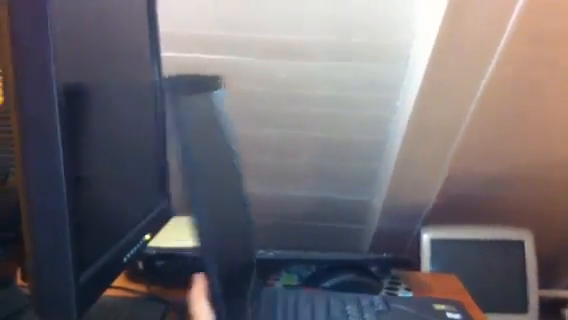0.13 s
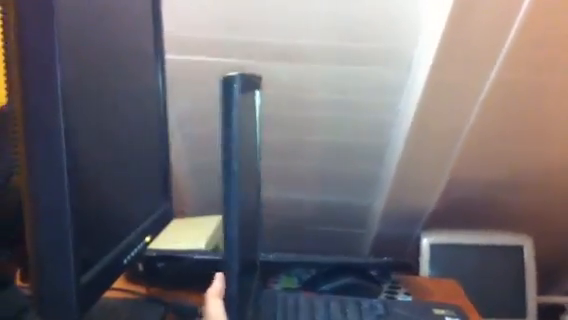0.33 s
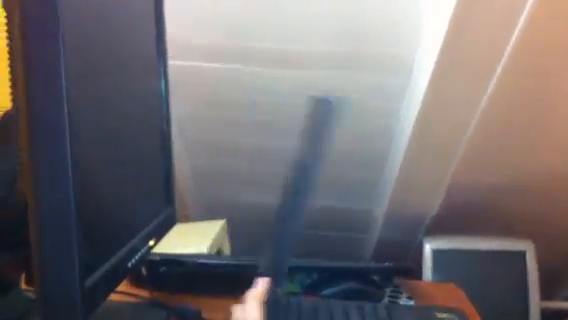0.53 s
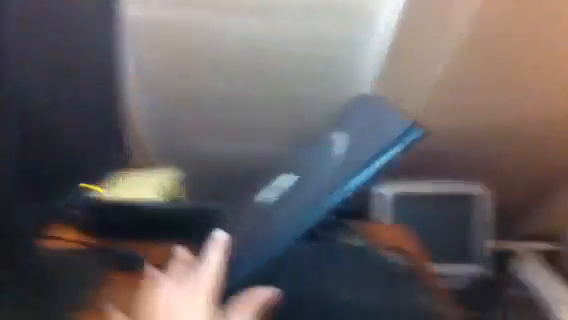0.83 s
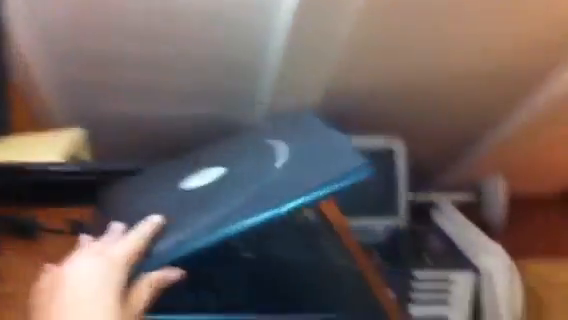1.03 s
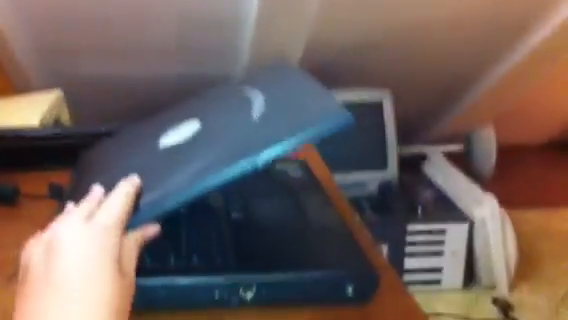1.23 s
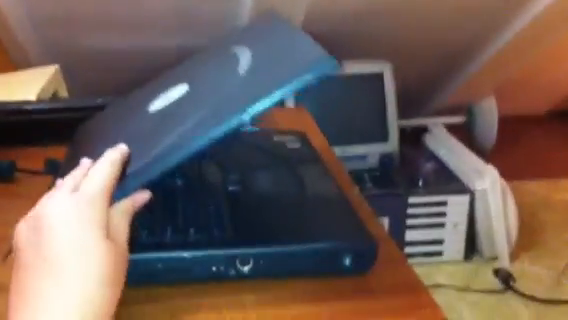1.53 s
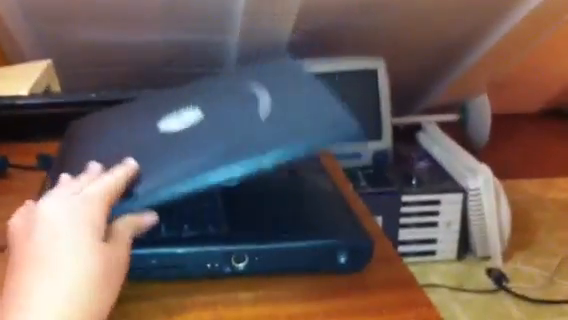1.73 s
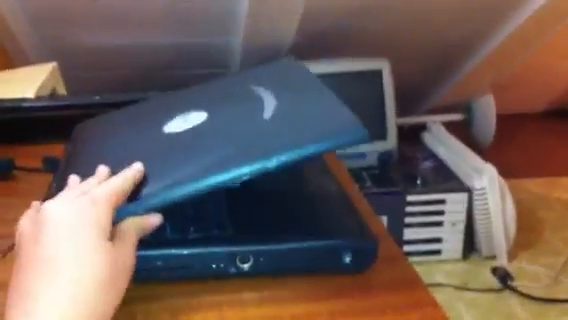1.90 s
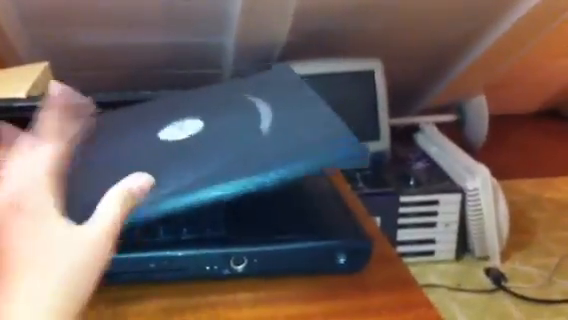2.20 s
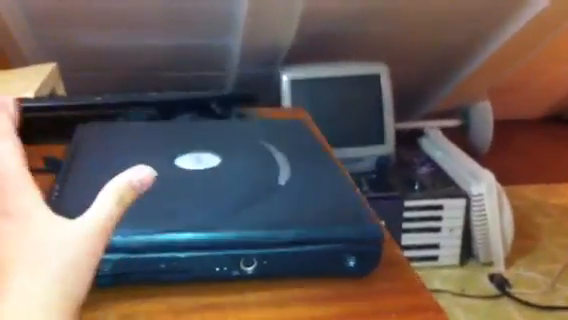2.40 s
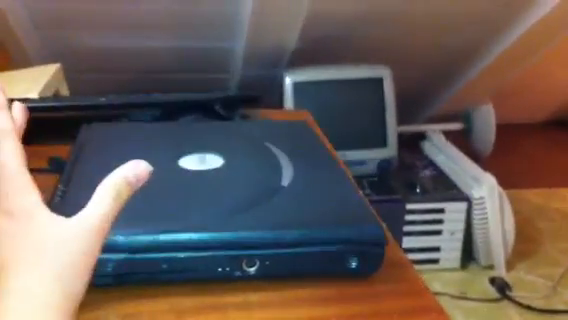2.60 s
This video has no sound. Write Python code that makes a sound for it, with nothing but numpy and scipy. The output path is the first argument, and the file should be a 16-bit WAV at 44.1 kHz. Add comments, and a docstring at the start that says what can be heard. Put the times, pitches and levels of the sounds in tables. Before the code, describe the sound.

A laptop lid shuts with a loud, hard plastic clack at about 2.45 s, several contacts almost at once, with short case and desk ringing and a small-room tail. Before it, very quiet: dull bumps from 0.1 s, clustered near 0.7 s, a hand brushing plastic with thuds and ticks around 0.9-1.25 s, sparse knocks, then a brief release scuff at 2.28 s. Low patter and faint microphone hiss throughout.

```python
"""A loose laptop lid clacks shut on its base in a small quiet room: noise cracks at each contact, ringing modes
of case and desk, and the room's decaying answer; just before it a short hiss swells and the level dips. Before
it a hand brushes the plastic (two-band hiss) and the case ticks (noise bursts), bumps (damped tones) and thuds
(low noise). Dull grains make a low patter, under microphone hiss."""
import sys
import numpy as np
from scipy import signal
from scipy.fft import rfft, irfft, next_fast_len
from scipy.io import wavfile
from scipy.ndimage import map_coordinates

SR = 44100
rng = np.random.default_rng(int(sys.argv[2]) if len(sys.argv) > 2 else 0)


def attenuation_scalar(level_db):
    """Turn a level in dB into a linear amplitude multiplier (20 dB per decade)."""
    decades = np.asarray(level_db, float) / 20
    return 10 ** decades


def generate_wav(signal):
    """Clip the signal to [-1, 1] and save it as 16-bit WAV at the path in sys.argv[1]."""
    frames = np.transpose(np.atleast_2d(signal))
    scaled = np.clip(frames, -1, 1) * 32767
    pcm = np.round(scaled).astype(np.int16)
    wavfile.write(sys.argv[1], SR, pcm)


N = 121275


def unit(x):
    """Scaled to rms 1."""
    return x / np.sqrt(np.mean(x ** 2) + 1e-20)


def along(points, hz):
    """(frequency [Hz], value) points read on a log frequency axis."""
    f, v = np.transpose(points)
    return np.interp(np.log(hz + 1), np.log(f + 1), v)


def level(rows):
    """Gain per sample from (time [s], level [dB]) rows."""
    s, db = np.transpose(rows)
    return attenuation_scalar(np.interp(np.arange(N) / SR, s, db))


def wobble(knots_per_s):
    """A smooth random curve, at most 100 knots a second."""
    knots = rng.standard_normal(400)
    return map_coordinates(knots, [np.arange(N) * min(knots_per_s, 100) / SR])


def filtered(x, response):
    """x shaped by a response of frequency in Hz."""
    m = next_fast_len(len(x) + SR // 2)
    spectrum = rfft(x, m) * response(np.fft.rfftfreq(m, 1 / SR))
    return irfft(spectrum, m)[:len(x)]


def noise(colour, count=N):
    """Coloured noise of rms 1."""
    return unit(filtered(rng.standard_normal(count), lambda hz: attenuation_scalar(along(colour, hz))))


def add(track, s, sound):
    """Adds a sound at s seconds, in place."""
    part = track[round(s * SR):][:len(sound)]
    part += sound[:len(part)]


def damped(hz, cycles, t):
    """A soft-starting sine that loses 20 dB every `cycles` cycles."""
    decay = attenuation_scalar(-20 * t * hz / cycles)
    attack = 1 - np.exp(-t * hz * 4)
    return np.sin(2 * np.pi * hz * t) * decay * attack


def room(x, colour):
    """The room's answer: a noise tail in which each frequency dies at its own speed."""
    # decay of the room: (frequency [Hz], t60 [s])
    room_t60 = [(100, 0.58), (400, 0.33), (2000, .43), (6000, 0.4), (11000, 0.32), (15000, 0.27)]
    delay_s = 0.003
    hz, t, z = signal.stft(rng.standard_normal(SR // 2), SR, nperseg=512)
    tail_db = along(colour, hz)[:, None] - 60 * t / along(room_t60, hz)[:, None]
    tail = signal.istft(z * attenuation_scalar(tail_db), SR, nperseg=512)[1]
    tail = np.pad(tail / np.linalg.norm(tail), (round(delay_s * SR), 0))
    return signal.fftconvolve(x, tail)[:N]


def mic_hiss():
    """Steady coloured noise of the microphone."""
    # spectrum of the hiss: (frequency [Hz], level [dB])
    hiss_colour = [(900, -35), (1500, -5.5), (2000, -6), (4000, -9), (8000, -12), (13000, -14.5),
                   (16000, -11.5)]
    return attenuation_scalar(-68.5) * noise(hiss_colour)


def patter():
    """Many small dull damped grains over a low coloured rumble, wavering in level."""
    # level of the patter: (time [s], level [dB])
    patter_level = [(0, -55.5), (.15, -59.5), (.3, -60), (.45, -56), (.52, -60.5), (.62, -55.5),
                    (.75, -57.5), (.85, -59), (.95, -57), (1.1, -55.5), (1.25, -56.5), (1.4, -58),
                    (1.55, -58), (1.62, -61), (1.78, -56.5), (1.87, -58.5), (1.92, -59), (2.1, -58.5),
                    (2.4, -59.5), (2.75, -59.5)]
    # spectrum of the rumble: (frequency [Hz], level [dB])
    rumble_colour = [(40, -63), (80, -23), (130, -16.5), (200, -7.5), (280, -10), (390, -6.5), (600, -12),
                     (900, -13.5), (1200, -15.5), (2000, -27.5), (3500, -43.5), (5000, -70)]
    grains_per_s, grain_share = 250, 0.33  # share of the power
    centre_hz, low_hz, high_hz, spread_octaves = 519.6, 200, 3000, 0.61
    grain_cycles, spread_db = 3.76, 2.5

    count = int(grains_per_s * N / SR)
    start = (rng.random(count) * N).astype(int)
    hz = centre_hz * 2 ** (spread_octaves * rng.standard_normal((count, 1)))
    hz = np.clip(hz, low_hz, high_hz)
    gain = attenuation_scalar(spread_db * rng.standard_normal((count, 1))) * np.sqrt(hz / centre_hz)
    k = np.arange(2048)
    grains = gain * damped(hz, grain_cycles, k / SR)
    grains = np.bincount((start[:, None] + k).ravel(), grains.ravel(), N + 2048)[:N]
    mix = np.sqrt(grain_share) * unit(grains) + np.sqrt(1 - grain_share) * noise(rumble_colour)
    return level(patter_level) * attenuation_scalar(0.92 * wobble(11.93)) * mix


def brush():
    """Skin on plastic: a slightly gritty hiss, duller where its treble share falls."""
    # hand on the plastic: (time [s], level [dB], treble share [0-1])
    strokes = [(.85, -88, 0.9), (.9, -67.5, .9), (.95, -61.5, 0.93), (1.02, -61.5, 0.8), (1.05, -58, 0.74),
               (1.1, -60.5, 0.54), (1.16, -58, 0.7), (1.21, -64.5, 0.5), (1.28, -73.5, .05),
               (1.36, -93, .05), (1.525, -85, .05), (1.545, -66, .05), (1.59, -71.5, .05), (1.64, -79, .05),
               (2.26, -90, .4), (2.272, -62, 0.4), (2.287, -52.5, 0.45), (2.31, -61, 0.5), (2.35, -67, 0.2),
               (2.42, -82, .1)]
    # spectrum of the body of the hiss: (frequency [Hz], level [dB])
    body_colour = [(700, -38), (1200, 0), (2200, -3), (3700, -3), (6500, -5.5), (8000, -10), (11000, -46)]
    # spectrum of its treble: (frequency [Hz], level [dB])
    treble_colour = [(4000, -30), (7000, -1), (9000, 0), (13000, -2), (16000, -1.5)]
    grit_db = 0.7
    s, db, treble = np.transpose(strokes)
    share = np.interp(np.arange(N) / SR, s, treble)
    hiss = noise(body_colour) + share * noise(treble_colour)
    return level(np.c_[s, db]) * attenuation_scalar(grit_db * wobble(80)) * hiss


def thuds():
    """The hand on the case: low noise that starts fast and dies away."""
    # soft broad thuds: (time [s], level [dB], t60 [s])
    thud_rows = [(0.747, -49, 0.059), (1.04, -54.5, 0.11), (1.166, -44, 0.091), (1.181, -47.5, 0.084),
                 (1.225, -54, 0.12), (2.275, -52, 0.16)]
    # spectrum of a thud: (frequency [Hz], level [dB])
    thud_colour = [(40, -30), (90, -2), (150, 4), (450, -2), (1300, -5.5), (2000, -10), (3000, -29),
                   (5000, -80)]
    attack_s = 0.0024
    out, t = np.zeros(N), np.arange(8192) / SR
    for s, db, t60 in thud_rows:
        shape = attenuation_scalar(db - 60 * t / t60) * (1 - np.exp(-t / attack_s))
        add(out, s, shape * noise(thud_colour, count=8192))
    return out


def bumps():
    """Dull bumps of the case, each two damped tones."""
    # bumps: (time [s], level [dB], pitch [Hz], decay [cycles per 20 dB])
    bump_rows = [(.085, -43.5, 1070, 7.9), (0.34, -50, 392, 5.4), (.466, -43, 637, 8),
                 (.625, -45.5, 473, 6.8), (.687, -39, 940, 5.4), (.689, -39.5, 600, 4.3),
                 (.722, -38.5, 746, 4), (.815, -46, 454, 5.5), (1.037, -36, 1200, 3.4),
                 (1.055, -44.5, 397, 5.6), (1.168, -45.5, 444, 9.3), (1.374, -40.5, 1100, 5.9),
                 (1.763, -49, 340, 4.1), (2.1, -54, 396.6, 24), (2.165, -55, 600, 4.1),
                 (2.211, -50.5, 716, 3.4), (2.359, -48, 388, 4.3)]
    out, t = np.zeros(N), np.arange(4096) / SR
    for s, db, hz, cycles in bump_rows:
        tones = damped(hz, cycles, t) + 0.25 * damped(1.44 * hz, cycles, t)
        add(out, s, attenuation_scalar(db) * tones)
    return out


def ticks():
    """Bright ticks of the plastic: short noise bursts around a centre frequency."""
    # ticks: (time [s], level [dB], centre [Hz], t60 [s])
    tick_rows = [(.525, -62, 5200, .02), (.688, -61, 2040, 0.025), (.748, -60, 3000, 0.039),
                 (1.0372, -43.5, 3530, 0.037), (1.116, -48.5, 6000, .02), (1.145, -47.5, 10000, 0.028),
                 (1.666, -50.5, 5730, 0.024), (1.817, -52.5, 4430, 0.022), (2.217, -58, 6500, .015),
                 (2.2838, -46.5, 4970, 0.031), (2.66, -54, 11000, .04)]
    width_octaves, attack_s = 0.99, 0.001
    out, t = np.zeros(N), np.arange(2048) / SR
    for s, db, centre_hz, t60 in tick_rows:
        def band(hz):
            return np.exp(-0.5 * (np.log2((hz + 1) / centre_hz) / width_octaves) ** 2)
        shape = attenuation_scalar(db - 60 * t / t60) * (1 - np.exp(-t / attack_s))
        add(out, s, shape * unit(filtered(rng.standard_normal(2048), band)))
    return out


def clack():
    """The lid shuts: a crack at each contact, the ringing case and the room's answer. Separately, a faint hiss
    swells just before the blow."""
    # lid edge meeting the base at several points: (time [s], level [dB])
    contacts = [(2.4450, -15.5), (2.4460, -17), (2.4474, -14), (2.4486, -17.5), (2.4499, -17.5),
                (2.4510, -24), (2.4527, -19.5), (2.4540, -25), (2.4650, -22.5)]
    # broad spectrum of cracks and swell: (frequency [Hz], level [dB])
    crack_colour = [(35, -28), (60, -21), (160, -7), (400, -3), (600, -10), (1000, 1), (1500, -5),
                    (2200, -1.5), (4300, -5.5), (8000, -10), (12500, -7.5), (14600, -2.5), (16000, -32)]
    # modes of case and desk: (frequency [Hz], level [dB], t60 [s])
    case_modes = [(158.7, -32.5, 0.27), (252, -29, 0.19), (364, -41.5, 0.2), (401, -28.5, 0.23),
                  (759, -37.5, 0.23), (1100, -32, 0.23), (1346, -39.5, 0.26), (1554, -37, 0.27),
                  (1830, -34, 0.25), (2030, -32.5, 0.28), (2310, -44, .15), (4715, -32, 0.11),
                  (12600, -30, 0.14)]
    # spectrum of the room's answer: (frequency [Hz], level [dB])
    answer_colour = [(35, -40), (70, -16), (200, -6.5), (500, -9), (800, -6.5), (1400, -8.5), (2000, -7.5),
                     (3000, -10.5), (6400, -9.5), (9000, -12), (12000, -9.5), (16000, -14.5)]
    blow_s, crack_t60_s, answer_db = 2.4455, 0.013, 6.5
    ring_attack_s, ring_waver_db = 0.0037, 3.5
    swell_s, swell_fade_s, swell_end_db, swell_db_per_s = 0.0095, 0.0023, -25, 1850

    out, t = np.zeros(N), np.arange(SR // 2) / SR
    for s, db in contacts:
        crack = attenuation_scalar(db - 60 * t[:1024] / crack_t60_s) * noise(crack_colour, count=1024)
        add(out, s, crack)

    ring = np.zeros(len(t))
    for hz, db, t60 in case_modes:
        waver_db = ring_waver_db * wobble(45)[:len(t)]  # each mode swells and dips as it dies
        tone = np.sin(2 * np.pi * (hz * t + rng.random()))
        ring += attenuation_scalar(db - 60 * t / t60 + waver_db) * tone
    add(out, blow_s, ring * (1 - np.exp(-t / ring_attack_s)))

    before = t[:round(swell_s * SR)]
    rise = attenuation_scalar(swell_end_db - swell_db_per_s * before[::-1])
    swell = rise * np.clip(before / swell_fade_s, 0, 1) ** 2
    add(out, blow_s - swell_s, swell * noise(crack_colour, count=1024)[:len(before)])

    push = np.zeros(N)
    push[round(blow_s * SR)] = attenuation_scalar(answer_db)
    return out + room(push, answer_colour)


def scene():
    """The lid and the hand in the room, over patter and hiss."""
    small = thuds() + bumps() + ticks()
    small_in_room = small + attenuation_scalar(-6) * room(small, [(100, 0)])
    return (mic_hiss() + patter() + brush() + small_in_room + clack())[None]


def low_pass(x):
    """Removes everything above the highest recorded frequency."""
    return signal.sosfilt(signal.butter(12, 16780, fs=SR, output="sos"), x)


def record(dry):
    """A small microphone without deep bass or top treble. Separately, the level dips to nothing for a moment
    just before the blow."""
    low_cut_hz, top_hz, rumble_db = 113, 15950, -90
    gap_s, gap_length_s, gap_fade_s = 2.428, 0.0082, 0.0037
    b, a = signal.butter(2, low_cut_hz / (SR / 2), "high")
    rumble = attenuation_scalar(rumble_db) * noise([(28, 9), (40, -9), (80, -43)])
    x = signal.lfilter(b, a, dry[0]) + rumble
    t = np.arange(N) / SR
    outside_gap_s = np.maximum(gap_s - t, t - gap_s - gap_length_s)
    x = x * np.clip(outside_gap_s / gap_fade_s, 0, 1)
    mix = filtered(x, lambda hz: hz < top_hz)[None]
    return low_pass(mix)


dry = scene()
out = record(dry)
generate_wav(out)
```